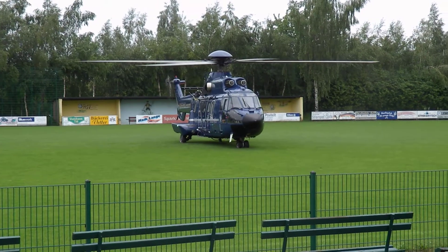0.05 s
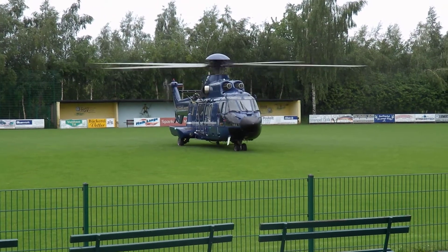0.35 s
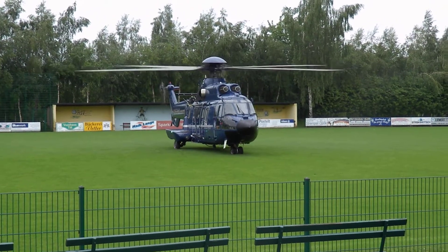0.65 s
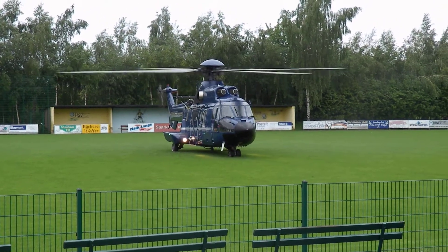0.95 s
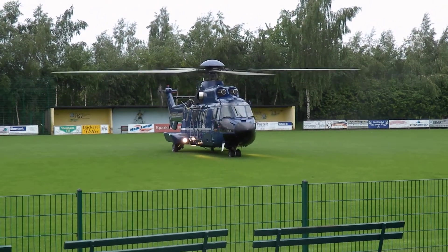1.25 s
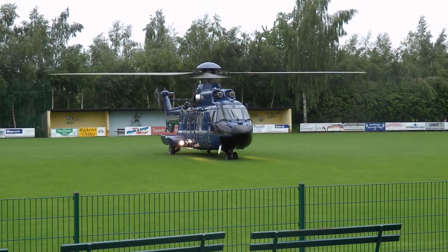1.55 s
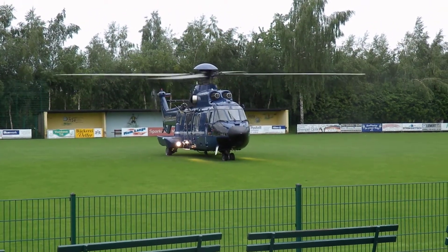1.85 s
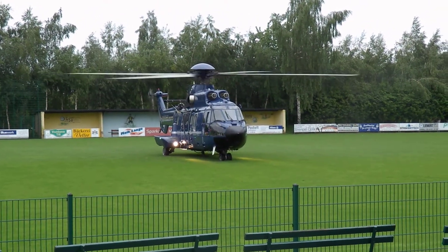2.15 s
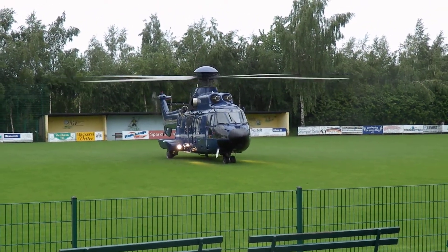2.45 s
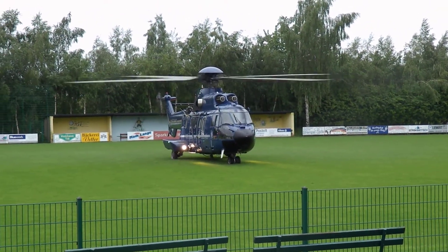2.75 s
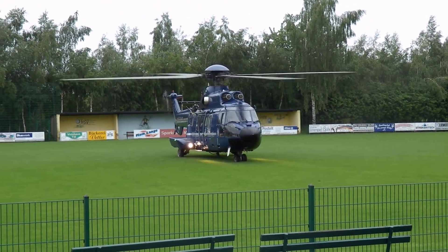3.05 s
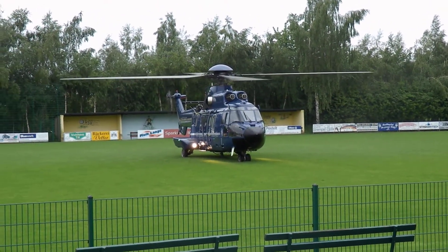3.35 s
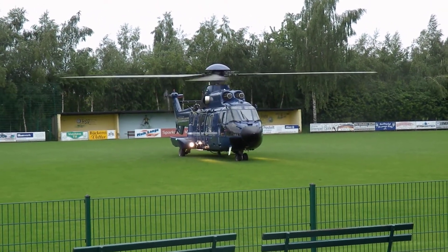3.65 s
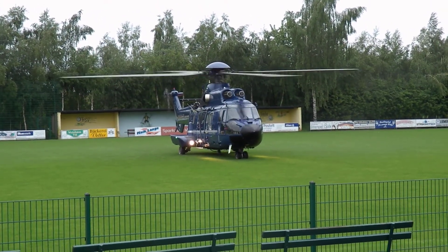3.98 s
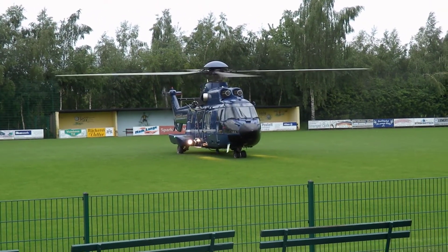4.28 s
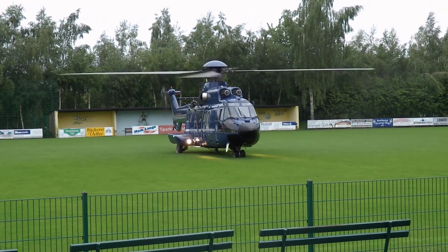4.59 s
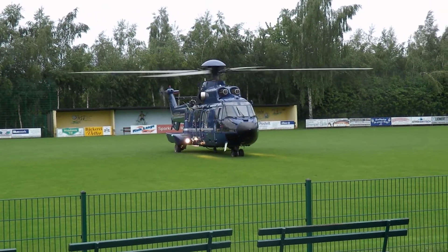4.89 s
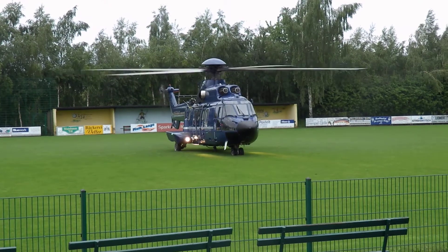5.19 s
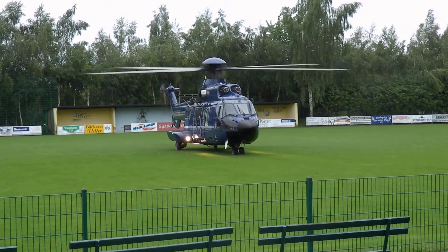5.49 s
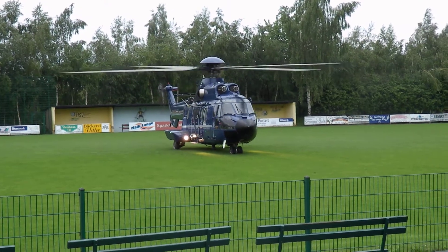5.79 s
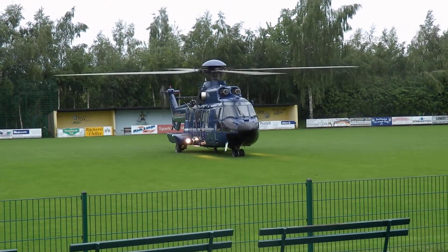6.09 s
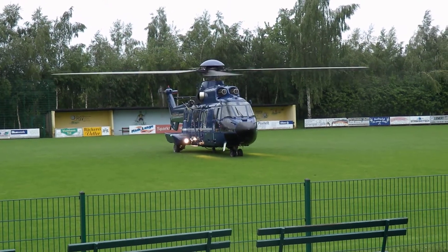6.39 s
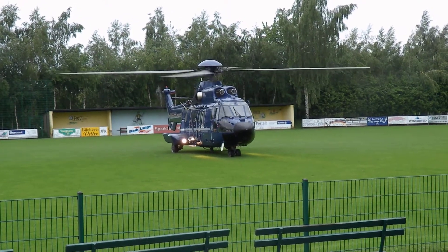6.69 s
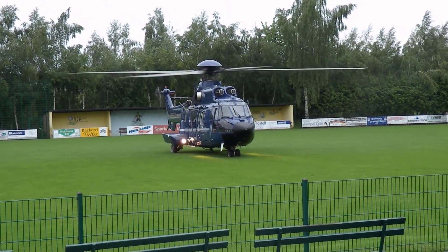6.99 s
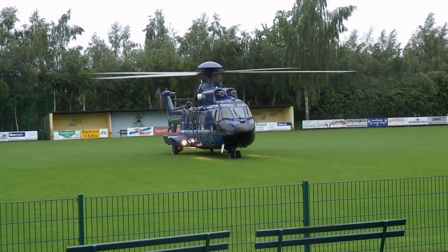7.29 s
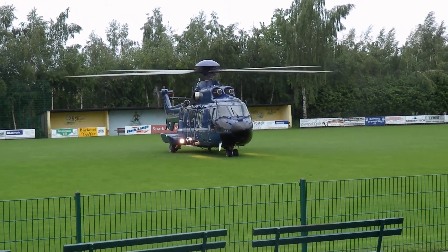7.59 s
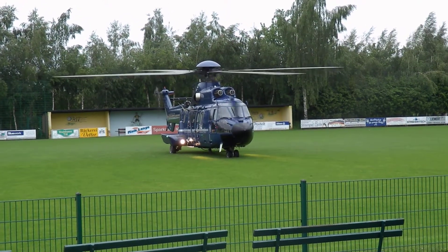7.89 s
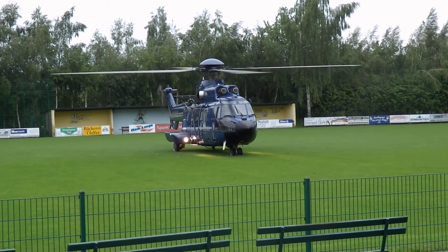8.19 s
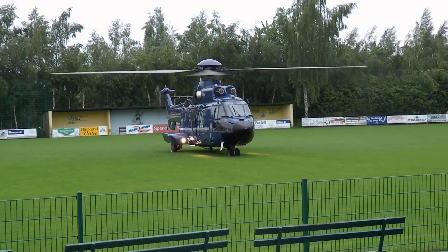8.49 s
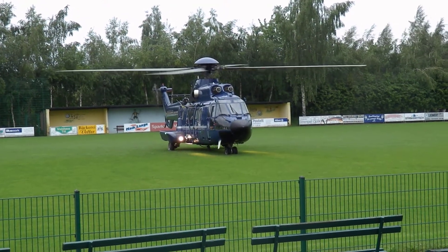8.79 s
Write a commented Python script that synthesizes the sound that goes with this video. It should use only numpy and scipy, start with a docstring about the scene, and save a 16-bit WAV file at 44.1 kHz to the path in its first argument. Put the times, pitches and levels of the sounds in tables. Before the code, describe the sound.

A helicopter idles on the ground, its high turbine whistle and hiss fluttering over a low exhaust roar and rotor drone.

```python
"""A grass pitch, with a helicopter idling some way off, its rotors turning.
The compressor whistles near 8 kHz over its intake hiss; churned air flutters and smears the whistle.
Below it the exhaust roars with a bounce off the ground, the tail rotor drones, the main rotor throbs
faintly and the gearbox sings. A limiter holds the loudest flares of the whistle."""
import sys
import numpy as np
from scipy.fft import rfft, irfft, next_fast_len
from scipy.io import wavfile
from scipy.ndimage import uniform_filter1d, minimum_filter1d, map_coordinates

SR = 44100
rng = np.random.default_rng(int(sys.argv[2]) if len(sys.argv) > 2 else 0)


def wav_out(sig):
    """Save sig, one row per channel (or a flat mono array), as 16-bit PCM at SR to the path in sys.argv[1]."""
    wavfile.write(sys.argv[1], SR, np.round(np.clip(np.atleast_2d(sig).T, -1, 1) * 32767).astype(np.int16))


N = 389844
COMPRESSOR_BLADES = 19
MAIN_BLADE_HZ, TAIL_BLADE_HZ = 17.2, 103.5
SIDES = np.array([[1], [-1]])  # opposite signs for left and right


# The compressor's blade-pass note, sagging slightly: time_s, pitch_hz
WHISTLE_PITCH = [(0, 8060), (2.5, 8059), (3.0, 8046), (3.5, 8033), (7.8, 8031), (8.84, 8038)]
# Weaker tones around the whistle: shaft_harmonic, level_db
SHAFT_TONES = [(13, -26.5), (15, -27), (16, -20.5), (17, -10), (21, -18.5), (23, -28), (25, -32),
               (27, -30.5), (30, -33), (32, -39), (34, -31), (36, -24.5)]

def compressor(whistle_db, halo_db, tones_db):
    """Spinning blades whistle; eddies bend the direct sound and scatter a halo around it."""
    shaft = angle(curves(WHISTLE_PITCH)[0] / COMPRESSOR_BLADES)
    wander = 0.73 * wobble(14) + 0.45 * wobble(70)
    stereo_skew = np.exp(1j * 0.11 * SIDES * wobble(13))
    flutter = unit(amp(0.96 * wobble(65) + 0.72 * wobble(190) + 0.6 * SIDES * wobble(15)))
    direct = amp(whistle_db) * flutter * np.exp(1j * wander)
    around = scatter(width_hz=34, edge_hz=360) + 0.25 * SIDES * scatter(width_hz=40, edge_hz=400)
    halo = amp(halo_db + 1.0) * around
    whistle = (direct + halo) * np.exp(1j * COMPRESSOR_BLADES * shaft)
    tones = 0
    for order, db in SHAFT_TONES:
        blur_hz = 7 * (order / COMPRESSOR_BLADES) ** 2  # eddies blur shorter waves more
        tones = tones + amp(db) * scatter(blur_hz, edge_hz=82) * np.exp(1j * order * shaft)
    return np.sqrt(2) * np.real(stereo_skew * (whistle + amp(tones_db) * tones))


# Broad, bright air hiss: frequency_hz, level_db
HISS_EQ = [(1500, -45), (3900, -13.5), (5000, -5.5), (6000, -1.5), (6800, 1), (8500, -3), (9500, -7),
           (10500, -13), (13000, -20.5), (15500, -16)]
# The intake duct's hump near the whistle: frequency_hz, level_db
DUCT_EQ = [(5500, -45), (6500, -9), (7100, -6.5), (7700, 1.5), (8300, -6.5), (8900, -16), (10000, -49)]

def intake(hiss_db, halo_db, main_phase):
    """Air hisses as it rushes into the engine, fluttering in the rotor wash."""
    flutter = unit(amp(1.12 * wobble(30) + 1.23 * wobble(110) + 0.19 * np.cos(2 * main_phase)))
    hiss = amp(hiss_db + 3.5) * rush(lambda hz: along(HISS_EQ, hz))
    hump = amp(halo_db - 4.0) * rush(lambda hz: along(DUCT_EQ, hz))
    return flutter * (hiss + hump)


# The exhaust's low body: frequency_hz, level_db
RUMBLE_EQ = [(10, -29), (28, -11), (70, -8), (120, -1), (200, -0.5), (260, -5), (380, -10.5), (480, -20),
             (700, -22), (1500, -78)]
# Pipe resonances in the rumble: centre_hz, width_hz, boost_db
PIPE_RESONANCES = [(153.4, 4.4, 6), (314.5, 23, 8), (415.3, 16, 8.5)]
# The jet's midrange: frequency_hz, level_db
ROAR_EQ = [(200, -42), (430, -10.5), (600, -1), (850, -2.5), (1300, -7), (1700, -3.5), (2100, -13),
           (2800, -19.5), (4000, -19), (6000, -13), (12000, -60)]
# The jet's raspy edge: frequency_hz, level_db
RASP_EQ = [(1400, -49), (2000, -3.5), (2400, 0.5), (2800, -1), (3050, -5), (3400, -3.5), (3900, -11.5),
           (4700, -9.5), (7000, -37), (14000, -40)]

def exhaust(rumble_db, roar_db, rasp_db, main_phase, tail_phase):
    """The pipe rumbles and resonates; both rotors lightly chop the jet's roar and rasp."""
    def rumble_eq(hz):
        peaks = sum(db / (1 + (2 * (hz - centre) / width) ** 2) for centre, width, db in PIPE_RESONANCES)
        return along(RUMBLE_EQ, hz) + peaks

    rumble = amp(rumble_db - 1.4) * rush(rumble_eq)
    slap_db = 0.25 * np.cos(main_phase) + 0.5 * np.cos(2 * main_phase) + 0.4 * np.cos(4 * main_phase)
    chop = unit(amp(slap_db + 0.46 * np.cos(tail_phase) + 1.04 * wobble(40) + 0.5 * wobble(250)))
    roar = amp(roar_db + 0.31) * rush(lambda hz: along(ROAR_EQ, hz) + ground_bounce_db(hz))
    rasp = amp(rasp_db + 1.1) * rush(lambda hz: along(RASP_EQ, hz))
    return rumble + chop * (roar + rasp)


def ground_bounce_db(hz, delay_s=0.001073, share=0.31, fade_hz=2550):
    """Comb colour of the direct sound plus its bounce off the grass, which swallows the treble."""
    bounce = share / (1 + (hz / fade_hz) ** 2)
    return 20 * np.log10(np.abs(1 + bounce * np.exp(-2j * np.pi * hz * delay_s)) + 1e-6)


# Slow fader ride on the drone's fundamental: time_s, level_db
DRONE_RIDE = [(0.0, -23.5), (1.38, -23.5), (2.49, -25.0), (3.57, -21.5), (4.95, -23.0), (6.32, -24),
              (7.66, -24), (7.99, -21), (8.16, -25), (8.84, -24.5)]
# Fader ride on its overtones: time_s, level_db
OVERTONE_RIDE = [(0.0, -34), (0.11, -26), (1.65, -29), (2.62, -25), (2.71, -28), (3.64, -26), (3.72, -37),
                 (3.89, -26.0), (4.98, -33.5), (5.14, -26.5), (5.81, -23.5), (7.11, -28.5), (7.29, -23),
                 (7.95, -32), (8.11, -27), (8.84, -23.5)]
# The drone's low overtones: blade_harmonic, level_db
TAIL_OVERTONES = [(2, 1.5), (3, -7), (4, -24)]
# The buzz on top: blade_harmonic, level_db
TAIL_BUZZ = [(5, -20.5), (6, -21), (7, -14), (8, -13), (9, -35), (10, -23)]

def tail_rotor(phase, low_swell, roar_db):
    """Fast blades drone under overtones and a buzz that gusts shake more; all swell with the roar."""
    fade = unit(amp(2.5 * wobble(8)))
    drone_gain = amp(-27 + 1.02 * low_swell + swell(DRONE_RIDE))
    drone = drone_gain * harmonics([(1, 0)], phase, unsteady_db=1.2, smear_rad=0.15)
    overtone_gain = amp(-32 + 1.25 * low_swell + swell(OVERTONE_RIDE)) * fade
    overtones = overtone_gain * harmonics(TAIL_OVERTONES, phase, unsteady_db=1.0, smear_rad=0.15)
    shaken = phase + 0.13 * wobble(60)
    buzz = amp(roar_db - 1) * harmonics(TAIL_BUZZ, shaken, unsteady_db=3.0, smear_rad=0.27)
    return drone + overtones + buzz


# The main rotor's throb: blade_harmonic, level_db
THROB = [(1, -23), (2, -26), (3, -24), (5, -21), (8, -13.5), (11, -15.5), (13, -24)]

def main_rotor(phase, rumble_db):
    """Pressure pulses from the big blades throb faintly under the rumble."""
    return amp(rumble_db) * harmonics(THROB, phase, unsteady_db=0, smear_rad=0.062)


# Gear mesh tones: pitch_hz, level_db
GEAR_TONES = [(1226, -22), (1635, -22), (2114, -25)]

def gearbox(roar_db):
    """Meshing teeth sing faint, wavering tones."""
    tones = sum(amp(db + 3.9 * wobble(4.5)) * np.sin(angle(hz) + 0.7 * wobble(15))
                for hz, db in GEAR_TONES)
    return amp(roar_db) * np.sqrt(2) * tones


def harmonics(orders, phase, unsteady_db, smear_rad):
    """A rotor's pressure harmonics; gusty inflow shakes the phase of the higher ones more."""
    stereo_skew = 0.2 * SIDES * wobble(17)
    tones = 0
    for order, db in orders:
        gain = amp(db + unsteady_db * wobble(7))
        shaken = phase + smear_rad * wobble(12)
        tones = tones + gain * np.sin(order * shaken + stereo_skew + 2 * np.pi * rng.random())
    return np.sqrt(2) * tones


def scatter(width_hz, edge_hz):
    """Random complex gain of rms 1: a tone's many paths through eddies."""
    step = 8
    size = next_fast_len(N // step + 2)
    hz = np.fft.fftfreq(size, step / SR)
    real, imag = rng.standard_normal((2, size))
    rolloff = np.sqrt((1 + (hz / width_hz) ** 2) * (1 + (hz / edge_hz) ** 2))
    paths = np.fft.ifft((real + 1j * imag) / rolloff)
    return unit(np.interp(np.arange(N) / step, np.arange(size), paths))


# How alike the noise is left and right: frequency_hz, correlation
STEREO_LIKENESS = [(25, .6), (70, .8), (300, .8), (640, .9), (1400, .8), (3000, .55), (5000, .72),
                   (7500, .85), (13000, .72)]

def rush(colour_db):
    """Stereo noise of rms 1 with the given colour, partly alike in the two channels."""
    def mid_side_gains(hz):
        spread = np.arccos(along(STEREO_LIKENESS, hz)) / 2
        return amp(colour_db(hz)) * [np.cos(spread), np.sin(spread)]

    mid, side = filtered(rng.standard_normal((2, N)), mid_side_gains)
    return unit(np.array([mid + side, mid - side]))


def amp(db):
    """Decibels to gain."""
    return 10 ** (np.asarray(db) / 20)


def unit(x):
    """Scaled to rms 1."""
    return x / np.sqrt(np.mean(np.abs(x) ** 2) + 1e-20)


def along(points, hz):
    """An EQ-style curve read on a log frequency axis."""
    frequencies, values = np.transpose(points)
    return np.interp(np.log(hz + 1), np.log(frequencies + 1), values)


def curves(rows):
    """One value per sample for each column after the time."""
    time_s, *columns = np.transpose(rows)
    return [np.interp(np.arange(N) / SR, time_s, column) for column in columns]


def swell(ride):
    """A fader ride in dB about its own mean."""
    db, = curves(ride)
    return db - db.mean()


def wobble(rate_hz):
    """A smooth random curve through rate_hz knots a second."""
    coarse = np.arange(0, N + 16, 16)
    knots = rng.standard_normal(int(N * rate_hz / SR) + 4)
    smooth = map_coordinates(knots, [coarse * rate_hz / SR], mode="nearest")
    return np.interp(np.arange(N), coarse, smooth)


def angle(hz):
    """Running phase of something turning at hz."""
    return 2 * np.pi * np.cumsum(hz * np.ones(N)) / SR


def filtered(x, response):
    """x shaped by a gain for each frequency."""
    size = next_fast_len(N + SR // 4)
    return irfft(rfft(x, size) * response(np.fft.rfftfreq(size, 1 / SR)), size)[..., :N]


# The whistle flares and fades: time_s, level_db
WHISTLE_RIDE = [(0.0, -15.5), (0.34, -8), (0.38, -12.5), (0.92, -10), (1.2, -22), (1.33, -12.5),
                (2.1, -10.5), (2.83, -13.5), (2.88, -8.5), (3.28, -21.5), (3.45, -13), (4.28, -11),
                (4.34, -20), (4.42, -4.5), (4.5, -20), (4.63, -13.5), (5.32, -10.0), (5.45, -15),
                (5.62, -4), (5.73, -13), (6.15, -17), (6.36, -10), (6.65, -11), (6.81, -9), (7.12, -8),
                (7.24, -15), (7.3, -11), (7.94, -11), (8.04, -17.5), (8.31, -8.5), (8.78, -14.5),
                (8.84, -9)]
# The treble comes and goes on its own: time_s, level_db
HISS_RIDE = [(0.0, -19.5), (0.37, -22), (0.64, -18), (1.19, -24), (1.54, -15.5), (1.58, -21.5),
             (1.73, -17.5), (2.05, -25.5), (2.33, -18.5), (2.81, -23.0), (3.03, -27.0), (3.21, -28),
             (3.42, -23.5), (4.25, -19.5), (4.51, -26.5), (4.78, -17.5), (5.24, -20.0), (5.29, -24.5),
             (5.45, -28.5), (5.51, -24.5), (5.8, -26.0), (6.0, -26), (6.36, -18), (6.88, -18.0),
             (7.05, -22), (7.6, -20.5), (7.65, -16), (7.74, -20), (7.96, -25), (8.19, -19.0), (8.49, -21),
             (8.59, -17), (8.74, -20.5), (8.84, -17.5)]
# The low roar and rumble swell and fade, with a few sudden dips: time_s, level_db
LOW_RIDE = [(0.0, -18.5), (0.27, -18.0), (0.37, -23), (0.66, -19.5), (0.69, -23.0), (0.99, -26.5),
            (1.33, -22), (1.5, -15), (1.59, -24), (1.63, -20.0), (2.08, -28.5), (2.5, -23), (2.61, -28),
            (2.87, -25), (2.99, -28.5), (3.47, -21.5), (3.64, -22), (4.23, -19.5), (4.26, -22),
            (4.49, -23.5), (4.79, -16.0), (5.25, -21), (5.31, -26.5), (5.52, -23), (5.64, -26.5),
            (6.45, -13.0), (7.07, -18), (7.14, -15), (7.45, -20.5), (7.63, -15.5), (7.87, -21),
            (8.0, -21.5), (8.17, -17), (8.6, -18.5), (8.67, -23), (8.84, -20.5)]
# The exhaust grows duller, rumble up and rasp down: time_s, tilt_db
DULLING = [(0, -0.7), (2.6, -2), (3.3, 0.66), (8.84, 0.53)]
# Stereo balance across the spectrum: frequency_hz, left_minus_right_db
BALANCE = [(30, 1), (100, -1), (200, -2), (1300, -1.7), (2700, -3.5), (3700, -3), (4800, 0), (6500, 1.5),
           (8000, .2), (14000, 1.2)]

def scene():
    """The mix from beside the pitch; each layer swells with the sounds nearest in frequency."""
    ripple = 0.62 * wobble(16)  # small eddies
    low_swell = swell(LOW_RIDE) + ripple
    hiss_swell = swell(HISS_RIDE) + ripple
    whistle_swell = swell(WHISTLE_RIDE) + 2 * wobble(20)
    tilt_db, = curves(DULLING)
    # each fader: a resting level plus its share of the swells
    whistle_db = -16.5 + 1.27 * whistle_swell
    halo_db = -17.5 + 0.49 * hiss_swell + 0.43 * whistle_swell
    tones_db = -17.5 + 0.85 * hiss_swell
    hiss_db = -26 + hiss_swell
    rumble_db = -25 + 1.14 * low_swell + tilt_db
    roar_db = -26.5 + 1.07 * low_swell
    rasp_db = -30 + 0.63 * low_swell + 0.43 * hiss_swell - tilt_db
    main_phase, tail_phase = angle(MAIN_BLADE_HZ), angle(TAIL_BLADE_HZ)
    throb = main_rotor(main_phase, rumble_db)
    engine = (compressor(whistle_db, halo_db, tones_db)
              + intake(hiss_db, halo_db, main_phase)
              + exhaust(rumble_db, roar_db, rasp_db, main_phase, tail_phase))
    mix = engine + throb + tail_rotor(tail_phase, low_swell, roar_db) + gearbox(roar_db)
    return filtered(mix, lambda hz: amp(SIDES / 2 * along(BALANCE, hz)))


def record(dry):
    """A fast limiter holds the flares, a soft clip rounds what slips past, and the very top is cut."""
    threshold_db, ceiling, hardness, top_hz = 2.0, 0.99, 9, 15690
    needed_gain = np.minimum(1, amp(threshold_db) / (np.abs(dry).max(axis=0) + 1e-9))
    held = dry * uniform_filter1d(minimum_filter1d(needed_gain, size=180), size=120)
    rounded = held / (1 + np.abs(held / ceiling) ** hardness) ** (1 / hardness)
    return filtered(rounded, lambda hz: hz < top_hz)


dry = scene()
out = record(dry)
wav_out(out)
```